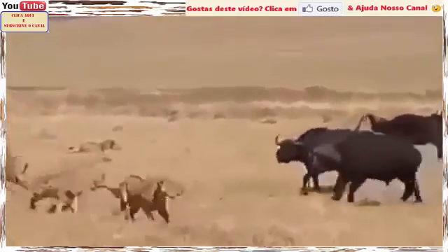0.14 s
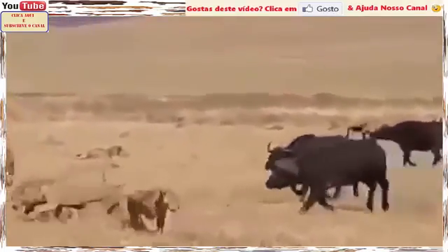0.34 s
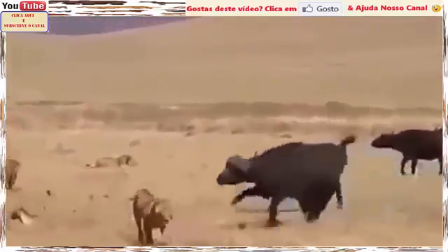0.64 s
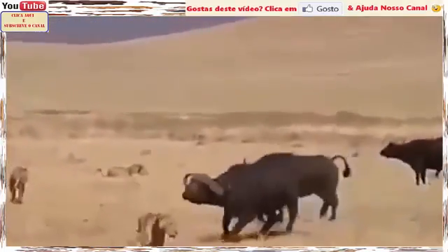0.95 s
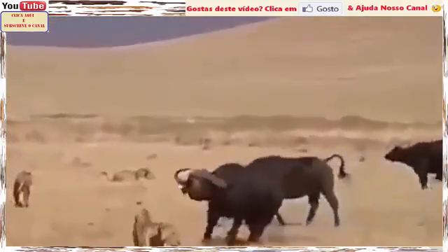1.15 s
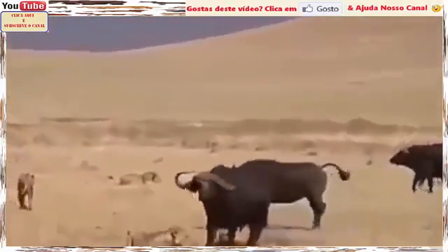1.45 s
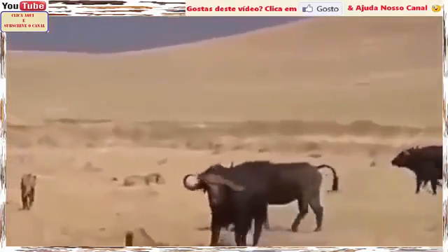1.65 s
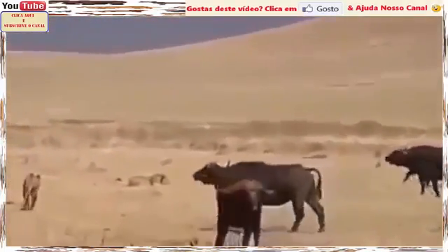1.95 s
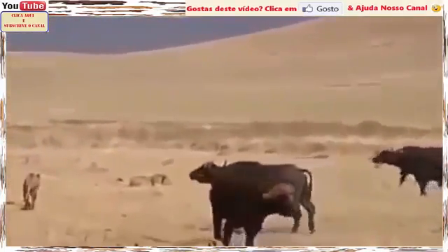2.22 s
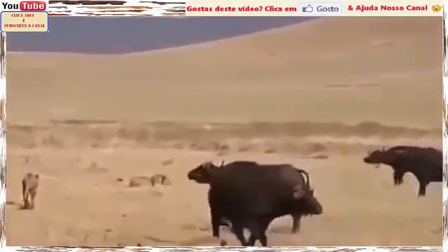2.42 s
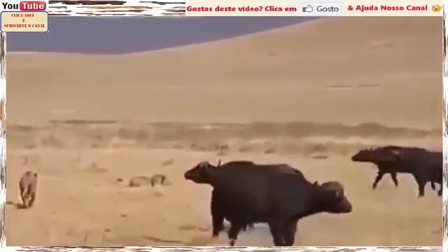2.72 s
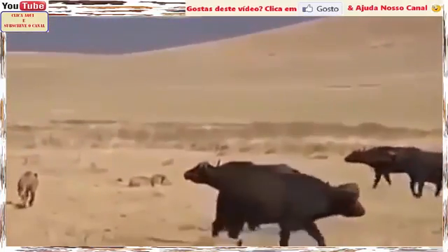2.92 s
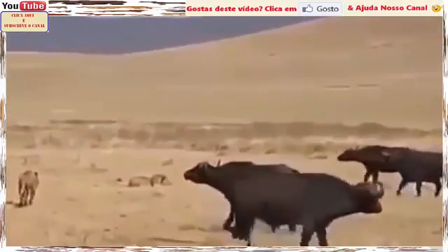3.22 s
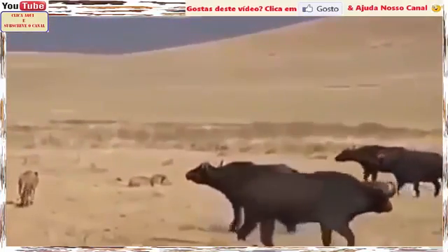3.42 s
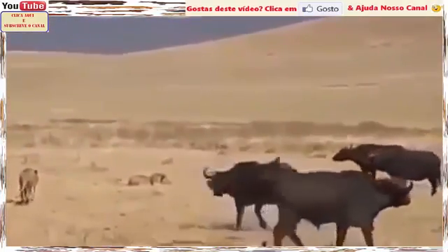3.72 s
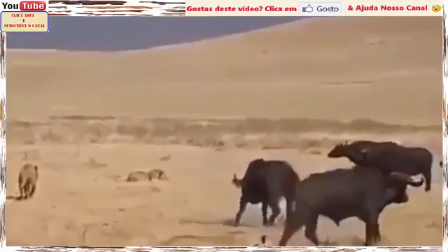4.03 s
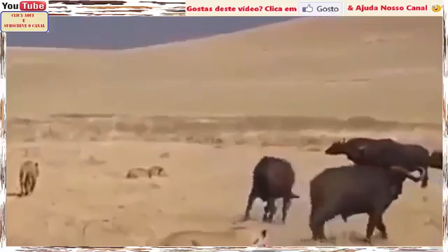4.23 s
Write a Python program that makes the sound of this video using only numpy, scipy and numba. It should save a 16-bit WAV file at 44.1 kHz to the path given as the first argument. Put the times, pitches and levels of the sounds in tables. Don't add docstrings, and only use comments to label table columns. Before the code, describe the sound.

A buffalo lets out a long rough bellow with a gliding moan, then a shorter pulsed grunt, over hissing dry grass and hoof thuds.

```python
import sys
import numpy as np
from scipy import signal
from scipy.io import wavfile
from scipy.ndimage import uniform_filter1d
from numba import njit

SR = 44100
rng = np.random.default_rng(int(sys.argv[2]) if len(sys.argv) > 2 else 0)


def boost(x):
    u = np.asarray(x, float) / 20
    return 10 ** u


def inscribe(sig):
    pcm = np.round(np.clip(np.atleast_2d(sig).T, -1, 1) * 32767)
    wavfile.write(sys.argv[1], SR, pcm.astype(np.int16))


N = 192452


def rms_one(x):
    return x / np.sqrt(np.mean(x ** 2) + 1e-20)


def even(x, span_s=0.0487):
    return x / np.sqrt(uniform_filter1d(x ** 2, int(span_s * SR)) + 1e-12)


def pan(x, db):
    return np.array([x * boost(db / 2), x * boost(-db / 2)])


def band_pass(x, order, low_hz, high_hz):
    return signal.sosfilt(signal.butter(order, [low_hz, high_hz], "band", fs=SR, output="sos"), x)


def in_time(rows, fade=0.0087):
    s, *columns = np.transpose(rows)
    t = np.arange(N) / SR
    gate = np.interp(t, [s[0] - fade, s[0], s[-1], s[-1] + fade], [0, 1, 1, 0])
    return [gate] + [np.interp(t, s, c) for c in columns]


def at_hz(points, hz):
    points = np.array(points)
    return np.interp(np.log(hz), np.log(points[:, 0]), points[:, 1])


def drift(rate_hz):
    r = np.exp(-2 * np.pi * rate_hz / SR * 16)
    white = rng.standard_normal(N // 16 + 3002)
    slow = signal.lfilter([1], [1, -2 * r, r * r], white)[3000:]
    return np.interp(np.arange(N) / 16, np.arange(len(slow)), rms_one(slow))


@njit
def sweep(x, cosine, r):
    y = np.zeros(len(x))
    for i in range(2, len(x)):
        y[i] = (1 - r * r) / 2 * (x[i] - x[i - 2]) + 2 * r * cosine[i] * y[i - 1] - r * r * y[i - 2]
    return y


def formant(x, hz, width_hz):
    cosine = np.cos(2 * np.pi * hz / SR) * np.ones(N)
    r = np.exp(-np.pi * width_hz / SR)
    return even(sweep(sweep(x, cosine, r), cosine, r))


def folds(pitch_hz, rough, jitter):
    cycles = np.cumsum(pitch_hz * (1 + jitter * drift(60))) / SR
    closing = np.diff(np.floor(cycles), prepend=0) > 0
    size = boost(4.0 * rough * rng.standard_normal(N))
    breath = rng.standard_normal(N) * np.exp(-1.6 * (cycles % 1))
    return (1 - rough) * rms_one(closing * size) + rough * rms_one(breath)


def arched(s, length, hz, db, arch_db):
    u = np.linspace(0, 1, len(hz))
    return np.c_[s + length * u, hz, db - arch_db * (2 * u - 1) ** 2]


def whistle(rows, waver, flutter_db, overtone_db):
    gate, hz, db = in_time(rows)
    phase = 2 * np.pi * np.cumsum(hz * (1 + waver * drift(29.9))) / SR
    level = gate * boost(db + flutter_db * drift(35))
    return np.sqrt(2) * level * (np.sin(phase) + boost(overtone_db) * np.sin(2 * phase))


def banded_noise(spectrum, edges, patchy_db, crackle):
    # f/Hz, likeness [0-1]
    likeness = [(60, 0.44), (170, 0.75), (470, 0.86), (1310, 0.11), (3670, 0.032), (10300, 0.054)]
    # f/Hz, left minus right/dB
    sideways = [(60, -19), (170, -10), (470, -5.5), (1310, 6), (3670, -2), (10300, 8)]
    out, together = 0, drift(9.1)
    white = rng.standard_normal((2, 2, N)) * boost(crackle * drift(170))
    for k, (low, high) in enumerate(zip(edges, edges[1:])):
        mid, side = band_pass(white[k % 2], 2, low, high)
        hz = np.sqrt(low * high)
        alike = np.clip(at_hz(likeness, hz), -1, 1)
        gain = boost(at_hz(spectrum, hz) + patchy_db * (1.2 * together + drift(14)))
        lean = boost(at_hz(sideways, hz) / 2 * np.array([[1], [-1]]))
        out = out + gain * lean * (np.sqrt(1 + alike) * mid + np.sqrt(1 - alike) * side * [[1], [-1]])
    return rms_one(out)


def grass():
    # t/s, brushing of stalks/dB, weight of trampling/dB
    trampling = [(0.0, -33.5, -7), (0.31, -35.5, -4), (0.55, -34.5, 4), (0.82, -32.5, -1),
                 (1.06, -25.5, 4.5), (1.36, -27.5, 6), (1.6, -24, -0.5), (2.1, -24.5, -2.5),
                 (2.55, -26.5, 1), (3.01, -28, 0), (3.25, -29, -6.5), (3.63, -35, -2), (3.92, -39.5, -2.5),
                 (4.27, -46, -24.5), (4.36, -48, -21)]
    # f/Hz, density/dB
    hiss_spectrum = [(900, -20.5), (1300, -10.5), (2200, -2), (4000, -1), (7500, -2), (10700, -7),
                     (12500, -6)]
    # f/Hz, density/dB
    dull_spectrum = [(71, -33), (120, 2), (280, -4), (476, 0.5), (1070, 0.5), (2000, -13), (2600, -32),
                     (4400, -120)]
    _, bright_db, weight_db = in_time(trampling)
    bright = banded_noise(hiss_spectrum, np.geomspace(1000, 12500, 9), patchy_db=.7, crackle=.8)
    dull = banded_noise(dull_spectrum, np.geomspace(110, 2200, 9), patchy_db=1.9, crackle=.9)
    shake = rng.standard_normal((3, N))
    rumble = rms_one(band_pass(shake[:2] + .9 * shake[2], 2, 36, 135))
    dull_db = -33.5 + .7 * (bright_db + 29)
    rumble_db = -36 + .96 * weight_db + 2.8 * drift(10)
    return boost(bright_db + 5.0) * bright + boost(dull_db) * dull + boost(rumble_db) * rumble


def insects():
    # t/s, level/dB
    trill_level = [
        (0, -56),
        (.75, -55),
        (1.0, -60),
    ]
    gate, db = in_time(trill_level)
    trill = sum(formant(rng.standard_normal(N), hz, 53) for hz in (9480, 9680))
    return pan(gate * boost(db) * trill, 9)


def bird():
    # start t/s, length/s, top f/Hz, level/dB
    chirps = [
        (.252, .085, 4600, -35),
        (.52, .095, 4850, -31),
    ]
    end_hz, fall_s, fade_db = 3340, .032, 5
    u = np.linspace(0, 1, 40)
    out = 0
    for s, length, top_hz, db in chirps:
        hz = end_hz + (top_hz - end_hz) * np.exp(-(u * length / fall_s) ** 2)
        note = arched(s, length, hz, db - fade_db * u, arch_db=6)
        out = out + whistle(note, waver=0.003, flutter_db=.8, overtone_db=-40)
    return out


def hooves():
    # t/s, peak level/dB, ground f/Hz, left minus right/dB
    steps = [(0.272, -30.5, 85.5, 25), (0.439, -23, 103, 20), (0.493, -27.5, 113, 21),
             (0.53, -24.5, 46, 24.5), (0.56, -26, 73, 18), (0.613, -26, 83.4, 12), (0.653, -7.5, 121, -0.5),
             (0.712, -12.5, 97, 7.5), (0.76, -24.5, 92.6, -7), (0.828, -17, 112, 2), (0.851, -8, 132, 0.5),
             (1.011, -12.5, 163, -4), (1.418, -40, 157, 5), (1.631, -17, 140.1, -5), (1.68, -21, 162, 5),
             (1.719, -23, 147, -3), (1.757, -18, 72.7, -3), (1.801, -9.5, 139, -1),
             (2.141, -24, 45.3, 12.5), (2.599, -21, 90, -18), (2.708, -18.5, 139, -11.5)]
    out, t = np.zeros((2, N)), np.arange(int(.09 * SR)) / SR
    for s, db, hz, lean_db in steps:
        thud = np.sin(2 * np.pi * hz * t) * (t * hz * 2.1) * np.exp(1 - t * hz * 1.8)
        at = int(s * SR)
        out[:, at:at + len(t)] += pan(boost(db - 6.5) * thud, lean_db)
    return out


def herd():
    # start t/s, end t/s, level/dB
    lows = [
        (0.308, .8, -46),
        (1.9, 3.242, -42.5),
    ]
    hum = formant(rng.standard_normal(N), 262 * (1 + 0.065 * drift(9)), 56)
    return sum(in_time([(a,), (b,)], fade=0.33)[0] * boost(db + 5.0) * hum for a, b, db in lows)


def moans():
    # start t/s, length/s, from f/Hz, to f/Hz, level/dB
    short_moans = [
        (0.624, 0.086, 321, 320.5, -27.5),
        (0.835, 0.18, 135, 287.7, -22.5),
        (1.335, .16, 238, 230, -11),
        (1.62, 0.2, 74, 148.7, -25.5),
    ]
    # t/s, pitch f/Hz, level/dB
    long_moan = [
        (1.045, 200.5, -50),
        (1.07, 224.9, -11),
        (1.172, 281, -20),
        (1.216, 298.8, -15.5),
        (1.274, 297.8, -19),
        (1.37, 317.2, -23),
        (1.47, 316.2, -26),
        (1.63, 236.5, -12.5),
        (1.725, 237.6, -12.5),
    ]
    arrived = 1 - (1 - np.linspace(0, 1, 40)) ** 2.4
    tracks = [arched(s, length, a_hz + (b_hz - a_hz) * arrived, db, arch_db=15)
              for s, length, a_hz, b_hz, db in short_moans]
    tracks.append(long_moan)
    return sum(whistle(m, waver=0.025, flutter_db=2.2, overtone_db=-17.0) for m in tracks)


def bellow():
    # t/s, effort/dB, mouth opening [0-1]
    heaves = [
        [(.85, -51.5, .4), (.87, -28.5, 0.3), (.905, -26, 0.39), (.975, -26.5, 0.12), (1.005, -33.5, 0.4)],
        [(1.05, -27.5, 0.08), (1.1, -22, 0.37), (1.2, -23, 0.62), (1.31, -23, 0.48), (1.375, -14.5, 0.7),
         (1.455, -15, .9), (1.5, -22, 1), (1.56, -26, .4)],
        [(1.65, -20.5, 0.6), (1.74, -18, 0.51), (1.79, -26.5, 0.1), (1.86, -26.5, 0.74), (1.98, -34, 1),
         (2.02, -49, .5)],
    ]
    gate, effort_db, opening = in_time(sum(heaves, []))
    source = folds(138.9, rough=.62, jitter=.25)
    turbulence = folds(138.9, rough=.75, jitter=.3)
    chest_db = effort_db + 16.5 * (.5 - opening)
    throat_db = effort_db - 5.5 + 18 * (opening - .5)
    push_db = effort_db + 18
    chest = even(formant(source, 243, 276) + .5 * formant(source, 560, 370))
    throat = formant(source, 794.4 * (1 + .02 * drift(5.3)), 55)
    mouth = formant(source, 1306 * (1 + .05 * drift(8)), 140)
    mouth = even(mouth + formant(turbulence, 1100, 1100))
    roar_hz = (1500 - 700 * np.clip(opening - .6, 0, 1)) * (1 + .07 * drift(20))
    roar = formant(turbulence, roar_hz, 700)
    rasp = formant(source, 2500, 1500)
    body = boost(chest_db) * chest + boost(throat_db) * throat + boost(effort_db) * mouth
    body = body + boost(-26.5 + 1.6 * push_db) * roar + boost(-30.5 + .6 * push_db) * rasp
    return gate * body + moans()


def knock():
    out, t = np.zeros(N), np.arange(int(.05 * SR)) / SR
    at = int(1.013 * SR)
    burst = rms_one(band_pass(rng.standard_normal(len(t)), 2, 500, 1600))
    ring = np.sin(2 * np.pi * 300 * t)
    out[at:at + len(t)] = (boost(-9) * burst + boost(-7) * ring) * np.exp(-t / .012)
    return pan(out, 3.9)


def swishes():
    # peak t/s, level/dB, rise/s, centre f/Hz, left minus right/dB
    brushes = [(1.106, -19, 0.022, 950, 6), (1.671, -20, .1, 3130, 3), (1.754, -26, 0.036, 2940, 10.5),
               (1.877, -19.5, 0.033, 5800, 11), (2.087, -25, 0.085, 4980, -8.5),
               (2.426, -17, 0.071, 2200, 0), (2.626, -23.5, 0.038, 3860, 2.5),
               (2.754, -18, 0.028, 5960, 2.5), (2.889, -14.5, 0.038, 4090, 1),
               (3.176, -25.5, 0.068, 2710, -3), (3.419, -24.5, 0.086, 4200, -3.5),
               (3.503, -25, 0.019, 5740, -8.5), (3.611, -25.5, 0.0098, 6140, -12)]
    out, t = np.zeros((2, N)), np.arange(N) / SR
    white = rng.standard_normal((3, N)) * boost(1.0 * drift(470))
    white = white[:2] + 1.53 * white[2]
    for s, db, rise, hz, lean_db in brushes:
        fall = 0.74 * rise
        near = slice(int((s - 3 * rise) * SR), int((s + 4 * fall) * SR))
        swell = np.exp(-((t[near] - s) / np.where(t[near] < s, rise, fall)) ** 2)
        rustle = rms_one(band_pass(white[:, near], 1, hz / 2.54, min(hz * 1.4, 14000)))
        out[:, near] += boost(db) * swell * rustle * pan(np.ones(1), lean_db)
    return out


def grunt():
    # t/s, pitch f/Hz, effort/dB, mouth opening [0-1], lip spread/dB
    heaves = [
        [(3.37, 100.7, -48, 0, 4), (3.398, 100, -34.5, 0.43, 0), (3.405, 99.64, -23, 0.26, 11.5),
         (3.44, 102.6, -21, 0.31, -2.5), (3.482, 115.3, -19.5, 0.76, -11), (3.56, 123.3, -30.5, 0.42, -12)],
        [(3.608, 136.2, -19, 0.79, -6), (3.67, 142.7, -18.5, 0.5, -0.5), (3.736, 124.7, -18.5, 0.68, -4.5),
         (3.8, 118, -18, .95, -6.5), (3.866, 130.2, -21, 0.85, -3), (3.92, 133, -29, 0.4, -13)],
        [(3.98, 136.2, -21, 0.8, -4.5), (4.05, 133, -26, 0.67, -2.5), (4.108, 132.8, -31.5, 0.59, -4),
         (4.2, 116.4, -29, 0.88, -5), (4.272, 105.1, -39, 0.04, 8), (4.32, 107.3, -71, 0, -1)],
    ]
    # t/s, roughness [0-1]
    hoarseness = [
        (3.37, .3),
        (3.7, .27),
        (3.85, .05),
        (4.03, .05),
        (4.12, .28),
        (4.32, .25),
    ]
    gate, pitch_hz, effort_db, opening, spread_db = in_time(sum(heaves, []))
    source = folds(pitch_hz, in_time(hoarseness)[1], jitter=.008)
    chest_db = effort_db + 34 * (.45 - opening)
    throat_db = effort_db - 3.5 - 12 * (opening - .5)
    mouth_db = effort_db + 8 * (opening - .7)
    lips_db = effort_db + spread_db + 1.3 * drift(25)
    throat_hz = (830 + 150 * opening) * (1 + 0.037 * drift(7.8))
    mouth_hz = (1200 + 40 * opening - 5.0 * spread_db) * (1 + 0.023 * drift(10))
    chest = even(formant(source, 289.5, 73) + 0.15 * formant(source, 143, 75))
    throat, mouth = formant(source, throat_hz, 170), formant(source, mouth_hz, 115)
    lips = formant(source, 1580, 350) - .13 * formant(source, 2200, 1200)
    lips = even(lips - .07 * formant(source, 700, 250) - .13 * formant(source, 4000, 1500))
    low = boost(chest_db) * chest
    high = boost(throat_db) * throat + boost(mouth_db) * mouth + boost(lips_db) * lips
    return gate * low, gate * high


def ground_echoes(x):
    dull = band_pass(x, 1, 500, 2500)
    lags = (np.array([[.007, .019, .037], [.011, .024, 0.044]]) * SR).astype(int)
    return np.array([sum(np.roll(dull, lag) for lag in side) for side in lags])


def scene():
    long_call, (low, high) = bellow(), grunt()
    voices = pan(long_call, -0.16) + pan(low, -0.42) + pan(high, 1.6)
    voices = voices + boost(-10.0) * ground_echoes(long_call + high)
    ground = grass() + swishes() + hooves() + knock()
    return voices + ground + insects() + pan(herd(), 0) + pan(bird(), .8)


def coarse_transfer(x, starve, scatter_db, size=1024):
    # f/Hz, step over band rms/dB
    coarseness = [
        (150, -16),
        (400, -1),
        (1000, 3),
        (1800, 5),
        (2700, 5.5),
        (4000, 7.5),
        (8000, 5.5),
        (11000, 4),
    ]
    # f/Hz, extra step/dB
    side_shortage = [
        (150, 14),
        (500, 6),
        (1000, 3),
        (2500, 3),
        (4500, -1.5),
        (9000, -1),
    ]
    # start t/s, end t/s, extra step/dB, centre of the starved bands f/Hz
    shortage = [
        (.18, .85, 5.5, 650),
        (.18, .92, 5, 2000),
        (.92, 1.48, 4.6, 4900),
        (1.86, 2.1, 5.3, 3800),
        (2.1, 2.7, 2.2, 4000),
        (2.55, 2.9, 3.5, 1200),
        (3.0, 4.36, 2, 6800),
    ]
    n, k = np.arange(2 * size), np.arange(size)
    window = np.sin(np.pi * (n + .5) / (2 * size))
    basis = window[:, None] * np.cos(np.pi / size * np.outer(n + .5 + size / 2, k + .5))
    padded = np.pad(x, ((0, 0), (size, 2 * size)))
    starts = np.arange(0, N + size, size)
    bins = padded[:, starts[:, None] + n].reshape(-1, 2 * size) @ basis
    bins = bins.reshape(2, len(starts), -1, 8)
    power = np.mean(bins ** 2, axis=3) + 1e-12
    band_db = 10 * np.log10(np.minimum(uniform_filter1d(power, size=5, axis=2), 2.5 * power))
    masked_db = np.max(band_db, axis=(0, 2), keepdims=True) - band_db
    hz = (np.arange(size // 8) + .5) * 8 * SR / 2 / size
    short_db = 0
    for a, b, db, centre_hz in shortage:
        spell = in_time([(a,), (b,)], fade=.08)[0][np.minimum(starts, N - 1), None]
        short_db = short_db + spell * db * np.exp(-np.log2(hz / centre_hz) ** 2 / .8)
    short_db = np.array([short_db, 0 * short_db + at_hz(side_shortage, hz)])
    luck = uniform_filter1d(rng.standard_normal(band_db.shape), size=2, axis=1)
    step_db = band_db + at_hz(coarseness, hz) + short_db
    step_db = step_db + starve * (masked_db - 22) + scatter_db * luck
    step = boost(step_db)[..., None]
    kept = np.sign(bins) * np.floor(np.abs(bins) / step + .4) * step
    frames = (kept.reshape(-1, size) @ basis.T * 2 / size).reshape(2, -1, 2 * size)
    out = np.zeros_like(padded)
    for i, s in enumerate(starts):
        out[:, s:s + 2 * size] += frames[:, i]
    return out[:, size:size + N]


def roll_off(x):
    return signal.sosfilt(signal.butter(12, 10870, fs=SR, output="sos"), x)


def record(dry):
    left, right = np.clip(dry, -.9, .9)
    mid_side = np.array([left + right, left - right]) / 2
    mid, side = coarse_transfer(mid_side, starve=.1, scatter_db=2.6)
    return roll_off(np.array([mid + side, mid - side]))


dry = scene()
out = record(dry)
inscribe(out)
```